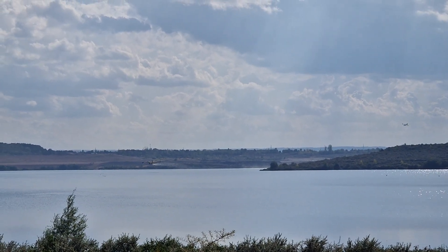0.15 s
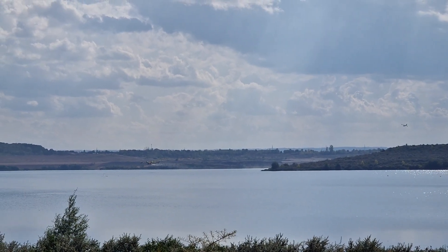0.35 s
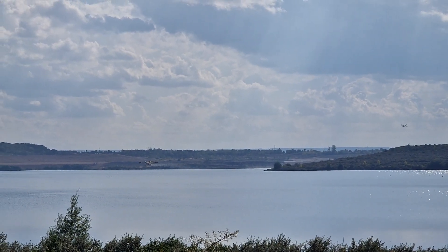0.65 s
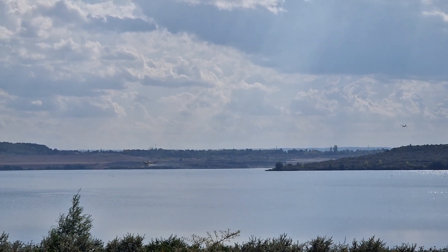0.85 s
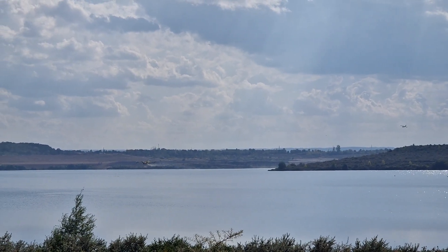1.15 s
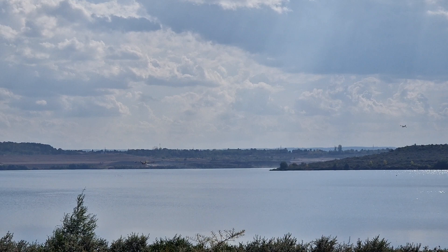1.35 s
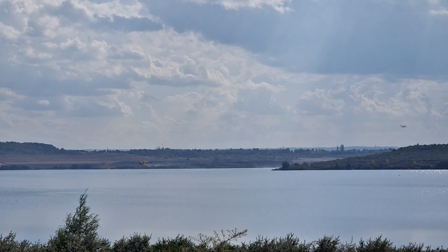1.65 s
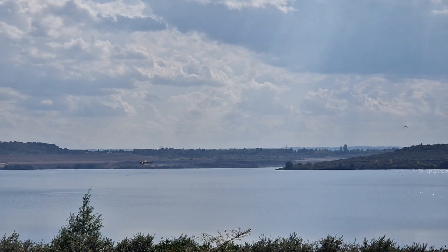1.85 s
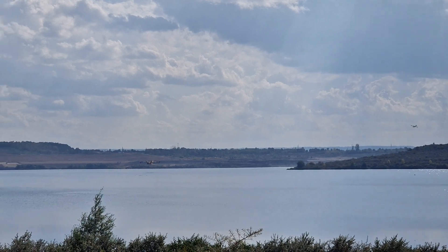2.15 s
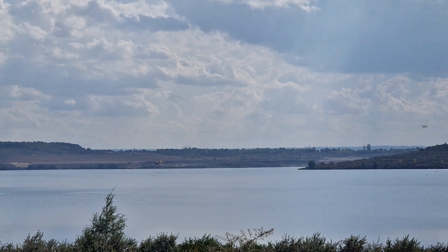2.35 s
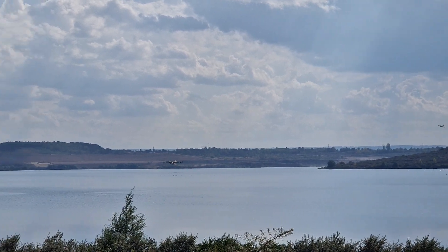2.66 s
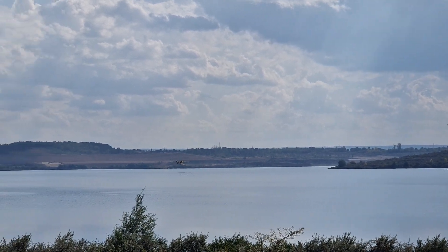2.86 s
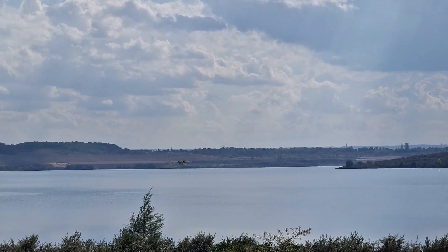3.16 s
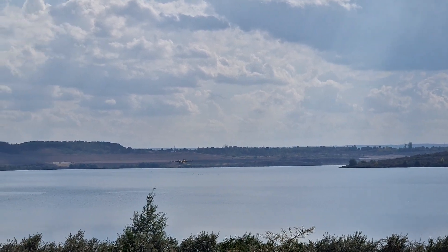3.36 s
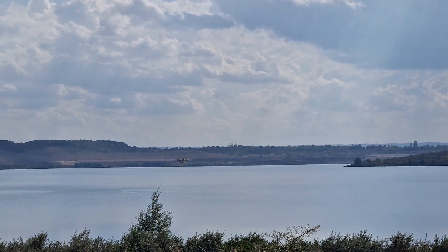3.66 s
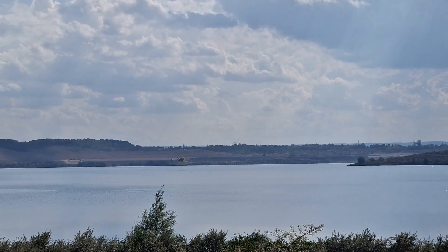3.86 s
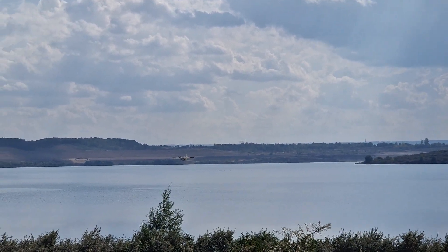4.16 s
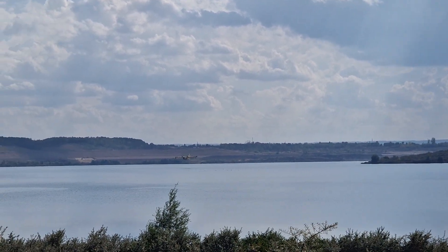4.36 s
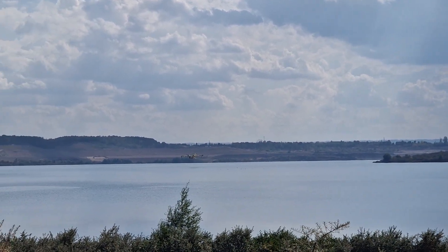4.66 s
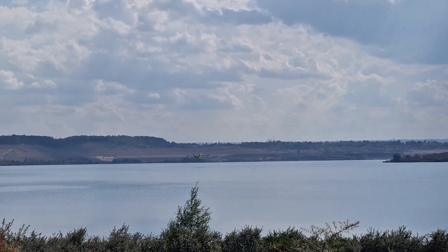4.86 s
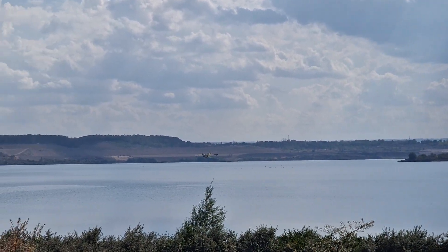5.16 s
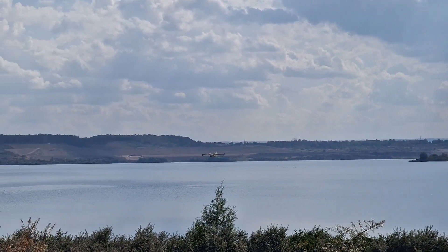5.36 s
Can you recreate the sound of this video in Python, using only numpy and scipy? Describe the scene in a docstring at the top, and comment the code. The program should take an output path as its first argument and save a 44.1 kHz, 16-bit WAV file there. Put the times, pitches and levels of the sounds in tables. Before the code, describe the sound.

A propeller aircraft drones on one low, very slowly rising note as it comes in over a lake, heard in stereo from the shore. The note wavers in the air above a rumbling exhaust. An uneven throb joins in, and the rush of the blades grows louder and brighter toward the end. Close by are a faint hiss, soft rustles and a few dry ticks.

```python
"""A propeller drones on one slowly rising note: an aircraft coming in low over a lake on a calm day,
heard from a stereo microphone on the shore. The blade passages make the note, and moving air fades its
overtones in and out. Uneven firing throbs against it, the exhaust rumbles beneath, and the rush of the
blades' vortices brightens as it nears. Close to the microphone are a faint hiss, rustles and ticks;
thin high tones come and go in the second half."""
import sys
import numpy as np
from scipy import signal
from scipy.fft import rfft, irfft
from scipy.io import wavfile
from scipy.ndimage import uniform_filter1d

SR = 44100
rng = np.random.default_rng(int(sys.argv[2]) if len(sys.argv) > 2 else 0)


def wrap_up_sound(samples):
    """Save the sound to the file named by the first command line argument, as 16-bit audio."""
    columns = np.atleast_2d(samples).T
    # keep every value between -1 and 1, then stretch to whole-number steps
    tamed = np.clip(columns, -1, 1)
    steps = np.round(tamed * 32767).astype(np.int16)
    wavfile.write(sys.argv[1], SR, steps)


N = 242988
TIME = np.arange(N) / SR

# blade passage rate: (time [s], rate [Hz])
BLADE_RATE = [(0, 93.5), (.9, 93.75), (2, 94.25), (3, 94.3), (3.5, 94.7), (4.3, 94.7), (5, 95.25),
              (5.51, 95.4)]
# the blade note at the shore, swelling and sinking in the moving air: (time [s], level [dB])
NOTE_LEVEL = [(0, -30.5), (.1, -32.5), (.3, -32), (.43, -27.5), (.54, -32.5), (.88, -28), (1.05, -30.5),
              (1.3, -33.5), (1.53, -34.5), (1.6, -28), (1.69, -38.5), (1.75, -28.5), (1.87, -34.5),
              (2.05, -32), (2.2, -28), (2.52, -28.5), (2.65, -31), (2.95, -30), (3.3, -31), (3.39, -36),
              (3.48, -32.5), (3.555, -33.5), (3.62, -31.5), (3.75, -34.5), (3.95, -28.5), (4.13, -34),
              (4.19, -26.5), (4.26, -34.5), (4.36, -26.5), (4.43, -29), (4.78, -23.5), (5.25, -22.5),
              (5.51, -23.5)]
# its octave, which fades on its own: (time [s], level [dB])
OCTAVE_LEVEL = [(0, -61), (.33, -53), (.45, -48.5), (.8, -46.5), (1.099, -43.5), (1.501, -59.5),
                (1.749, -46), (2.15, -65), (2.37, -44), (2.62, -46), (2.77, -52), (3, -47), (3.369, -53.5),
                (3.899, -44), (4.199, -45), (4.849, -34.5), (5.15, -32.5), (5.51, -37.5)]
# quick fading of the note, then of its octave: (depth [ratio], rate [Hz])
LOW_FADING = [(.14, 11), (.26, 8)]
# higher tones of the note: (multiple [of blade rate], relative level [dB])
OVERTONES = [(3, -9.5), (4, -19.5), (5, -22.5), (6, -20.5), (7, -21.5), (8, -26), (9, -25), (10, -22),
             (11, -20), (12, -21), (13, -23.5), (14, -23), (15, -21.5), (16, -30), (17, -33), (18, -23),
             (20, -43), (22, -36), (24, -44)]
# single overtones swelling briefly: (peak [s], multiple [of blade rate], level [dB], rise and fall [s])
FLARES = [(0.919, 3, -56, 0.26), (1.399, 4, -61, .14), (2.2, 3, -50, 0.073), (2.749, 4, -57.5, 0.24),
          (4.38, 5, -63.5, 0.17), (4.87, 3, -50.5, 0.25), (4.95, 6, -56, 0.18), (5.099, 4, -56.5, .25),
          (5.1, 10, -63.5, .3), (5.15, 12, -57, .35)]
# how near the aircraft is to the microphone: (time [s], nearness [0 far, 1 near])
NEARNESS = [(0, 0.018), (1.3, 0.22), (2.7, .5), (3.4, 0.61), (4.3, 0.97), (5.51, 1)]
# engine tones: (multiple [of blade rate], far level [dB], near level [dB])
ENGINE_ORDERS = [(.5, -53, -55), (0.762, -50, -59), (1.499, -71.5, -40.5)]
# shape of the exhaust's spectrum on the approach: (frequency [Hz], far [dB], midway [dB], near [dB])
EXHAUST_SPECTRA = [(20.2, -7, -9, -11.5), (36.3, -3.5, -6.5, -6.5), (48.5, 8, 4.5, 1), (59, 13, 7, -2),
                   (77, 14.5, 8.5, 9), (100, 14.5, 9.5, 11), (125, 13, 4.5, 5), (162, 1, 2.5, 3),
                   (210, -0.5, 2, 4.5), (267, -1.5, 2, -0.5), (298, -4.5, -6.5, -5.5),
                   (344, -8.5, -10.5, -7.5), (383, -8.5, -3.5, -13.5), (494, -8, -17, -17),
                   (567, -6.5, -10, -20), (745, -28, -31, -38.5)]
# how alike the aircraft's noise is left and right: (frequency [Hz], correlation [0 to 1])
STEREO_LIKENESS = [(25, 0.5), (60, 0.7), (150, 1), (300, 0.99), (500, 0.9), (1200, 0.89), (1700, .9),
                   (2200, 0.51), (4000, 0.43)]
# shape of the blade rush's spectrum: (frequency [Hz], far [dB], midway [dB], near [dB])
RUSH_SPECTRA = [(296, -27, -23, -18.5), (545, -4, -1, -11.5), (737, 2.5, -6, -13.5), (820, 2.5, 3.5, -10),
                (1170, -3.5, -8.5, -3), (1410, 0.5, -0.5, -3.5), (1620, -8.5, -5.5, -5.5),
                (1757, -10, -6.5, -8.5), (1930, -14.5, -13, -18.5), (2100, -16.5, -19, -16),
                (2330, -22.5, -25, -25), (2490, -29.5, -32, -34), (2650, -34.5, -34, -33),
                (3370, -36, -33, -29.5), (3950, -46, -48.5, -48)]
# the rush growing over the water: (time [s], relative level [dB])
RUSH_LEVEL = [(0, -62.5), (.4, -58.5), (.74, -57), (1.38, -61.5), (1.75, -59.5), (2.7, -60), (3.3, -56),
              (3.6, -52), (4.13, -50.5), (4.27, -47), (4.4, -49), (5, -46.5), (5.51, -45.5)]
# a gliding hump in the rush: (time [s], centre [Hz])
RUSH_HUMP = [(0.08, 1170), (0.26, 1276), (1.35, 964), (1.73, 1368), (3.56, 1147), (4.14, 1458), (4.6, 1398),
             (5, 1263), (5.5, 1066)]
# a raspy band at the rush's upper edge: (time [s], boost [dB], centre [Hz])
RUSH_RASP = [(0, 3, 2006), (.21, 8.5, 2143), (.33, 3.5, 2217), (.85, 3, 2203), (1.1, 1, 2134),
             (1.4, 5, 1945), (1.65, 0, 2000), (2.1, 2, 1997), (2.35, 6.5, 2100), (2.62, 14.5, 2100),
             (2.92, 8, 2033), (3.3, -2.5, 2004), (3.7, -2, 1898), (4, 0, 2208), (4.38, 8, 2190),
             (4.6, 6, 2150), (4.95, 6.5, 2026), (5.51, 0.5, 2000)]
# hiss on the shore: (frequency [Hz], relative level [dB])
HISS_SPECTRUM = [(2300, 3), (3500, 2), (4600, -5.5), (5700, -3), (6400, 0.5), (6900, -2.5), (7600, 5),
                 (8400, 2), (9500, -2.5), (11000, -7), (12500, -6.5), (15600, -7)]
# rustling close by: (frequency [Hz], relative level [dB])
RUSTLE_SPECTRUM = [(2000, -20), (3500, -4), (5500, 1), (7500, 0), (9500, -3), (11000, -1), (13000, -3),
                   (15600, -2)]
# where the rustling sits in the stereo image: (frequency [Hz], left minus right [dB])
RUSTLE_PAN = [(3000, -1), (7000, -0.5), (10000, -5.5), (14000, 2)]
# single soft rustles: (peak [s], level [dB], rise [s], fall [s], tilt [dB per octave])
RUSTLE_STROKES = [(.1, -83, .2, .2, -2), (.15, -75.5, 0.029, 0.012, -7.5), (1.65, -77.5, 0.018, .03, -3.5),
                  (2.07, -79, .02, .024, -3.5), (2.311, -76.5, 0.054, .062, -1),
                  (2.915, -78, .01, 0.022, -8.5), (4.389, -79.5, 0.34, 0.3, 3),
                  (4.675, -74, 0.027, 0.022, 2), (4.76, -65.5, 0.049, 0.043, 1),
                  (4.87, -75, 0.054, 0.065, 1.5), (5.05, -67, 0.077, 0.14, -1.5),
                  (5.241, -71, 0.12, 0.1, -0.5), (5.47, -82.5, .12, 0.14, -0.5)]
# dry ticks and scuffs close by:
# (time [s], level before the envelope [dB], centre [Hz], decay [s], sharpness [Q], left minus right [dB])
TICKS = [(.128, -65, 3900, .012, 1.6, 4), (.138, -69, 5800, 0.013, 2, 0), (.143, -59, 3200, 0.009, 2.2, 3),
         (.159, -59, 2700, .004, 1.6, 2), (.392, -67.5, 2600, .022, 3.4, 12),
         (0.537, -64.5, 2450, 0.02, 2.8, 7), (0.9125, -49, 2190, 0.0028, 3.8, 3.5),
         (1.6375, -52.5, 2400, 0.0018, 3, -0.5), (1.65, -68, 2700, .015, 3, 4),
         (2.75, -64, 7370, 0.0035, 1.8, -1.5), (4.04, -53.5, 2450, 0.026, 8, 2.5),
         (4.044, -61, 3400, 0.02, 3.8, 3), (4.099, -60, 3150, 0.027, 2.8, 6.5),
         (4.149, -62, 7800, 0.0023, 1, -1), (5.124, -60, 6700, .01, 2, 0),
         (5.141, -41, 6400, 0.0015, 3.1, -9.5), (5.164, -55.5, 5620, 0.024, 2.5, -9),
         (5.179, -42, 6000, 0.0014, 2, 2), (5.245, -60, 5300, .028, 1.3, -4)]
# brief thin high tones: (peak [s], level [dB], length [s], pitch [Hz], width [Hz])
WHISTLES = [(3.132, -81, 0.027, 4650, 447), (3.153, -75, 0.057, 5710, 750), (3.366, -82, 0.1, 2980, 197.7),
            (3.515, -76.5, 0.054, 3290, 119.6), (4.243, -83, 0.72, 3390, 129.6),
            (4.97, -69.5, 0.19, 3420, 188), (5.033, -67, 0.17, 3030, 230),
            (5.24, -64.5, 0.063, 2900, 130.6), (5.36, -72, 0.22, 2920, 171), (5.4, -86, .2, 3400, 130)]


def gain_of(db):
    """Decibels to amplitude."""
    return 10 ** (np.asarray(db) / 20)


def unit_rms(x):
    """Scales to rms 1."""
    return x / np.sqrt(np.mean(x ** 2) + 1e-20)


def curve(rows, t=TIME, column=1):
    """One column of a time table, joined by straight lines."""
    rows = np.asarray(rows, float)
    return np.interp(t, rows[:, 0], rows[:, column])


def spectrum(rows, hz, column=1):
    """One column of a spectrum, joined on a log-frequency axis."""
    rows = np.asarray(rows, float)
    return np.interp(np.log(hz + 1), np.log(rows[:, 0] + 1), rows[:, column])


def swell(peak_s, rise_s, fall_s):
    """A smooth rise to 1 and fall back."""
    return np.exp(-((TIME - peak_s) / np.where(TIME < peak_s, rise_s, fall_s)) ** 2)


def drift(rate_hz):
    """A random wander of rms 1, made of sines from an eighth of the rate to twice it."""
    t = np.linspace(0, TIME[-1], N // 200)
    rates = rate_hz * 2 ** rng.uniform(-3, 1, 20)
    wander = sum(np.sin(2 * np.pi * (f * t + rng.random())) * np.sqrt(f / (f + rate_hz / 2))
                 for f in rates)
    return np.interp(TIME, t, unit_rms(wander))


def grid(size):
    """Frame times (a column) and bin frequencies of a short-time spectrum."""
    hop = size // 4
    return np.arange(N // hop + 5)[:, None] * hop / SR, np.fft.rfftfreq(size, 1 / SR)


def noise(shape_db, likeness, patchy_db, size):
    """Stereo noise of rms 1, shaped over time and frequency and mottled by turbulence."""
    t, hz = grid(size)
    a, b, c, d, patches = rng.standard_normal((5, len(t), len(hz)))
    patches = uniform_filter1d(patches, size=14, axis=0)
    patches = unit_rms(uniform_filter1d(patches, size=9, axis=1))
    left = a + 1j * b
    right = likeness * left + np.sqrt(1 - likeness ** 2) * (c + 1j * d)
    frames = np.array([left, right]) * gain_of(shape_db + patchy_db * patches)
    _, sound = signal.istft(frames.swapaxes(1, 2), nperseg=size, noverlap=size - size // 4)
    return unit_rms(sound[:, :N])


def approach(spectra, t, hz):
    """The far spectrum turns into the midway one, then into the near one."""
    place = 2 * curve(NEARNESS, t)
    return sum(np.maximum(1 - abs(place - k), 0) * spectrum(spectra, hz, column=k + 1) for k in range(3))


def fading(depth, rate_hz):
    """A direct path to the microphone plus a wandering scattered one: a complex gain of mean power 1."""
    scattered = depth * (drift(rate_hz) + 1j * drift(rate_hz)) / np.sqrt(2)
    return (1 + scattered) / np.sqrt(1 + depth ** 2)


def propeller(passages):
    """Blade passages make a harmonic drone that brightens as it nears; air scatters high tones more."""
    note_db = curve(NOTE_LEVEL)
    overtone_db = -54 + .7 * (note_db + 30) + 1.5 * TIME  # shares the note's swells and grows steadily
    # each harmonic: (gain, fading depth, fading rate [Hz])
    harmonics = [(gain_of(note_db), *LOW_FADING[0]), (gain_of(curve(OCTAVE_LEVEL)), *LOW_FADING[1])]
    harmonics += [(gain_of(overtone_db + spectrum(OVERTONES, k)), .092 * k, 2.6 + .15 * k)
                  for k in range(3, 25)]
    out = np.zeros((2, N), complex)
    for k, (gain, depth, rate_hz) in enumerate(harmonics, 1):
        flare = sum(gain_of(db) * swell(peak_s, length, length)
                    for peak_s, multiple, db, length in FLARES if multiple == k)
        tone = (gain + flare) * fading(depth, rate_hz) * np.exp(2j * np.pi * (k * passages + rng.random()))
        spread = np.exp(1j * (.035 + .015 * k * drift(.93)))  # left and right paths differ slightly
        out += [tone * spread, tone / spread]
    return np.sqrt(2) * out.real


def engine(passages):
    """Uneven firing adds wavering tones; the strongest comes in, beats against the note and eases off."""
    throb_multiple, start_s, rise_s, fall_db_per_s = 1.258, 1.88, 1.7, 5
    age = TIME - start_s
    throb_db = -37.5 - fall_db_per_s * np.maximum(age - rise_s, 0)
    throb = gain_of(-59.5) + np.clip(age / rise_s, 0, 1) * gain_of(throb_db)
    near = curve(NEARNESS)
    orders = [(k, gain_of(far_db + (near_db - far_db) * near)) for k, far_db, near_db in ENGINE_ORDERS]
    orders.append((throb_multiple, throb))
    tones = sum(gain * fading(depth=.55, rate_hz=4) * np.exp(2j * np.pi * k * passages)
                for k, gain in orders)
    return np.sqrt(2) * tones.real


def exhaust():
    """Turbulent exhaust rumbles across the lake, fuller as the aircraft nears."""
    level_db, growth_db_per_s = -38, 2.5
    t, hz = grid(size=4096)
    rolloff_db = 30 * np.log2(np.maximum(hz / 800, 1))
    shape_db = approach(EXHAUST_SPECTRA, t, hz) + growth_db_per_s * t - rolloff_db
    gain = gain_of(level_db + .61 * drift(13))
    return gain * noise(shape_db, spectrum(STEREO_LIKENESS, hz), patchy_db=2, size=4096)


def blade_rush(passages):
    """Vortices shed by the blades: a rush with a gliding hump, pulsing faintly at the blade rate."""
    t, hz = grid(size=2048)
    hump_db = 5 * np.exp(-((hz - curve(RUSH_HUMP, t)) / 230) ** 2)
    rasp_db = curve(RUSH_RASP, t) * np.exp(-((hz - curve(RUSH_RASP, t, column=2)) / 310) ** 2)
    # a hoarse low roar opens up at close range
    roar_start_s, roar_db_per_s, roar_hz = 4.19, 10, 573
    roar_db = roar_db_per_s * np.maximum(t - roar_start_s, 0) * np.exp(-((hz - roar_hz) / 260) ** 2)
    rolloff_db = 20 * np.log2(np.maximum(hz / 3900, 1))
    shape_db = approach(RUSH_SPECTRA, t, hz) + curve(RUSH_LEVEL, t)
    shape_db += hump_db + rasp_db + roar_db - rolloff_db
    pulsing = 1 + .08 * np.cos(2 * np.pi * passages) + .06 * drift(20)
    flow = noise(shape_db, spectrum(STEREO_LIKENESS, hz), patchy_db=2.2, size=2048)
    return gain_of(-50.5) * pulsing * flow * gain_of([[.2], [-.2]])


def shore_hiss():
    """A steady faint hiss, wide around the microphone."""
    _, hz = grid(size=256)
    return gain_of(-76) * noise(spectrum(HISS_SPECTRUM, hz), likeness=.071, patchy_db=1.5, size=256)


def rustles():
    """Soft grainy strokes near the microphone, some duller than others, over a faint constant stir."""
    t, hz = grid(size=256)
    strokes = [(gain_of(db) * swell(peak_s, rise, fall), tilt)
               for peak_s, db, rise, fall, tilt in RUSTLE_STROKES]
    envelope = gain_of(-89) + sum(gain for gain, _ in strokes)
    db_per_octave = sum(gain * tilt for gain, tilt in strokes) / envelope  # louder strokes set the colour
    tilt_db = np.interp(t, TIME, db_per_octave) * np.log2(np.maximum(hz, 4000) / 7000)
    pan_db = np.array([[[.5]], [[-.5]]]) * spectrum(RUSTLE_PAN, hz)
    shape_db = spectrum(RUSTLE_SPECTRUM, hz) + pan_db + tilt_db
    rustle = noise(shape_db, likeness=.19, patchy_db=2.5, size=256)
    return rustle * envelope * gain_of(.99 * drift(70))


def ticks():
    """Each close tick is a quick, grainy burst through one resonance, with a faint wide crack."""
    length, crack_db, grain_db = SR // 4, -27.5, 1.5
    hz, age = np.fft.rfftfreq(length, 1 / SR), TIME[:length]
    out = np.zeros((2, N + length))
    for start_s, db, centre_hz, decay_s, sharpness, pan_db in TICKS:
        white = rng.standard_normal((2, length)) + .29 * rng.standard_normal(length)
        resonance = np.hypot(1, sharpness * (hz / centre_hz - centre_hz / (hz + 1))) ** -2.8
        crack = gain_of(crack_db) / np.hypot(1, hz / centre_hz)
        coloured = irfft(rfft(white) * (resonance + crack), length)
        grains = gain_of(grain_db * unit_rms(uniform_filter1d(rng.standard_normal(length), size=70)))
        envelope = (1 - np.exp(-age / (.41 * decay_s))) * np.exp(-age / decay_s)
        gain = gain_of(db + pan_db * np.array([[.5], [-.5]])) * np.sqrt(np.mean(envelope ** 2))
        start = round(start_s * SR)
        out[:, start:start + length] += gain * unit_rms(coloured * grains * envelope)
    return out[:, :N]


def whistles():
    """Narrow bands of noise swell as fuzzy, fluttering high tones, a little right of centre."""
    _, hz = grid(size=1024)
    out = np.zeros((2, N))
    for peak_s, db, length, centre_hz, width_hz in WHISTLES:
        band_db = -35 * np.log10(1 + ((hz - centre_hz) / width_hz) ** 2)
        fuzz = noise(band_db, likeness=.5, patchy_db=2, size=1024)
        out += fuzz * gain_of(db) * swell(peak_s, length / 2, length / 2)
    return out * gain_of([[-1.5], [1.5]])


def scene():
    """Over the lake, blades and engine follow one shaft; the shore adds its own small noises."""
    passages = np.cumsum(curve(BLADE_RATE)) / SR
    aircraft = propeller(passages) + engine(passages) + exhaust() + blade_rush(passages)
    return aircraft + whistles() + shore_hiss() + rustles() + ticks()


def record(dry):
    """The recorder's band limit cuts the highest treble."""
    lowpass = signal.firwin(511, cutoff=15750, window=("kaiser", 9), fs=SR)
    return signal.oaconvolve(dry, lowpass[None], "same")


dry = scene()
out = record(dry)
wrap_up_sound(out)
```